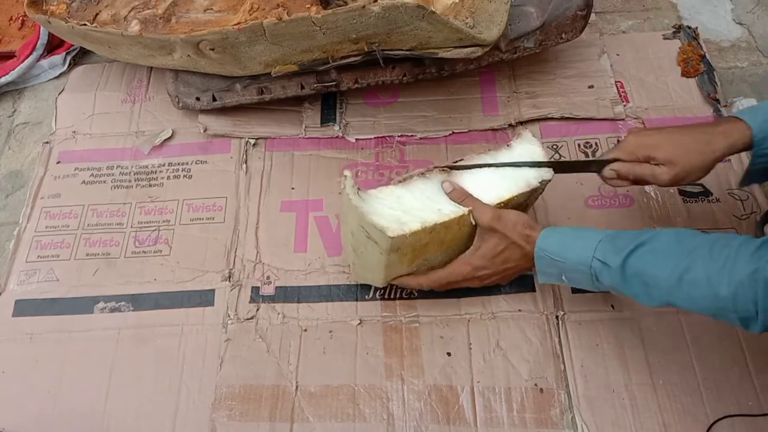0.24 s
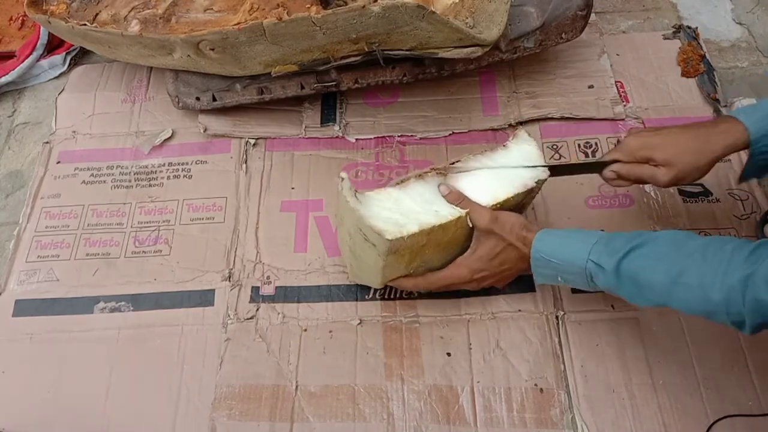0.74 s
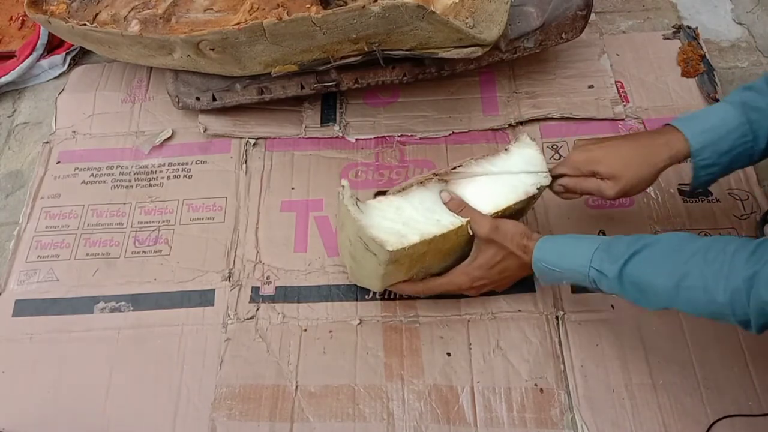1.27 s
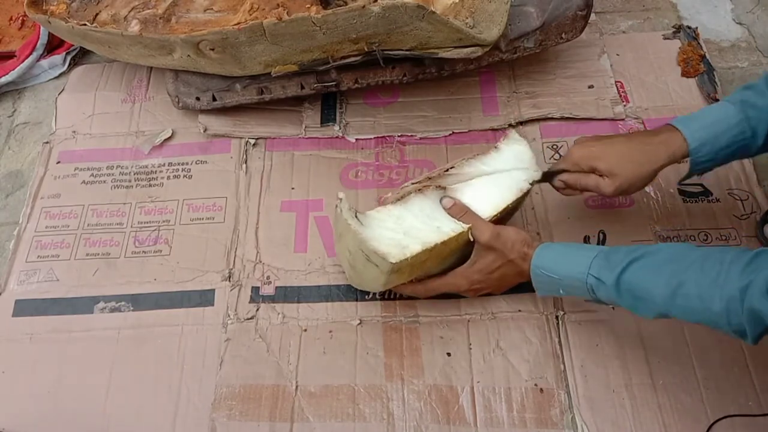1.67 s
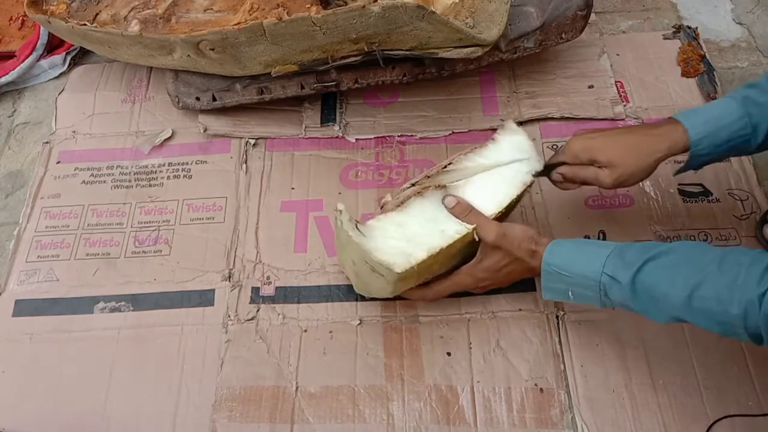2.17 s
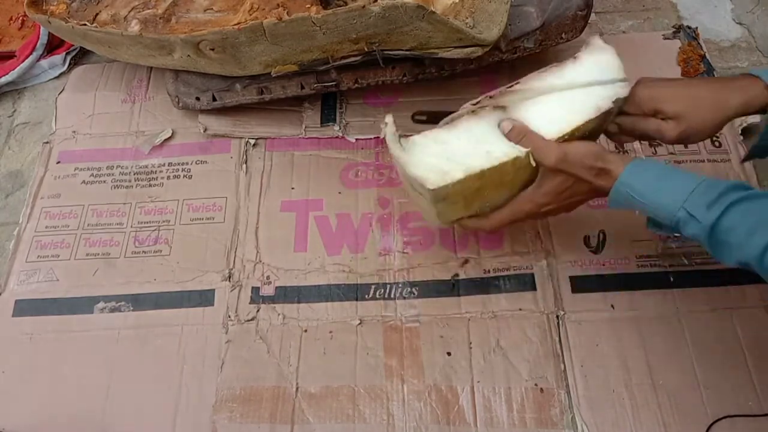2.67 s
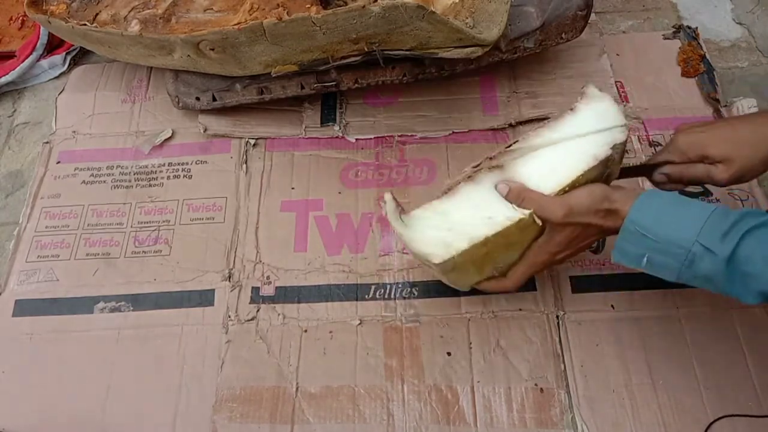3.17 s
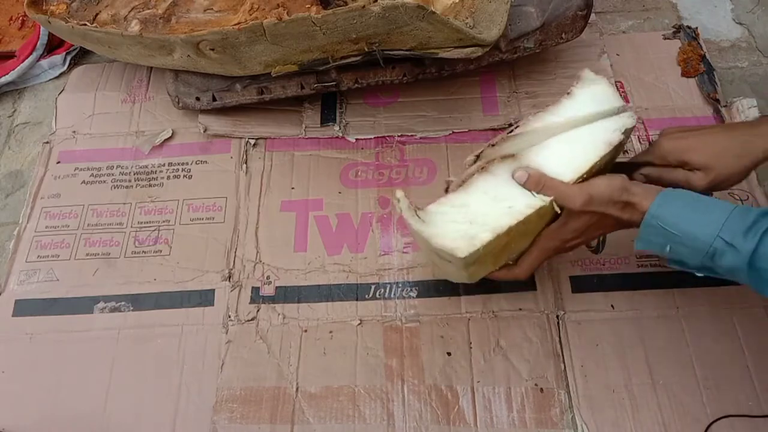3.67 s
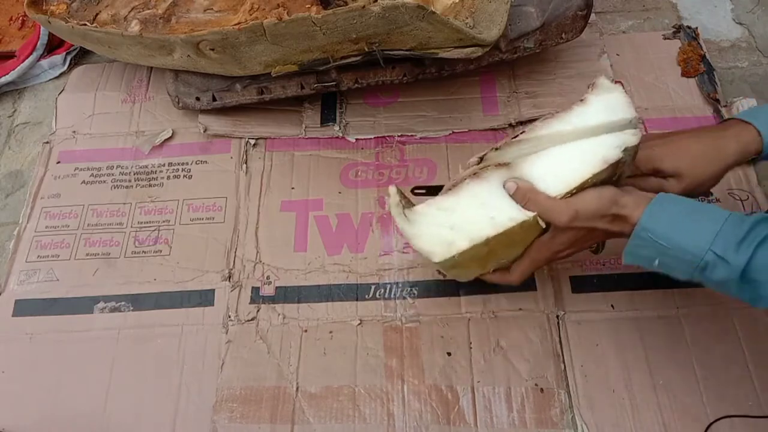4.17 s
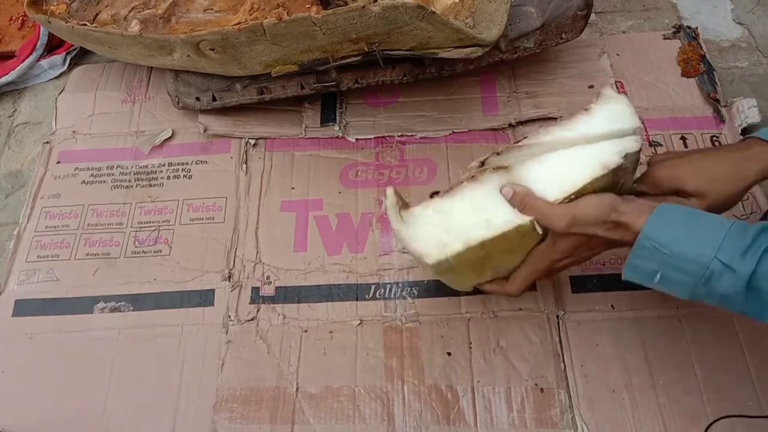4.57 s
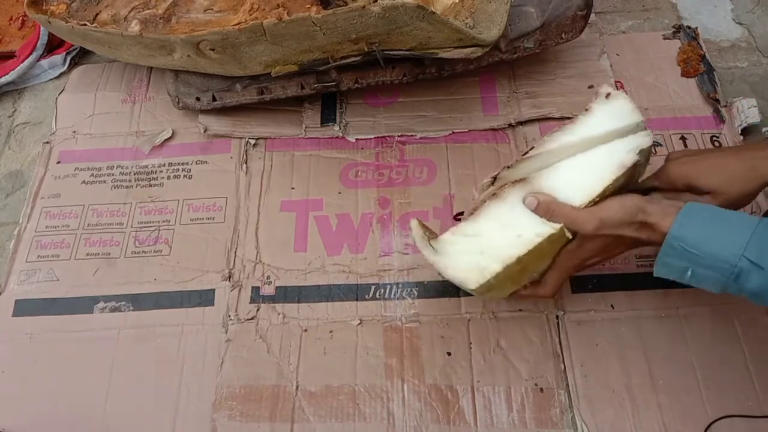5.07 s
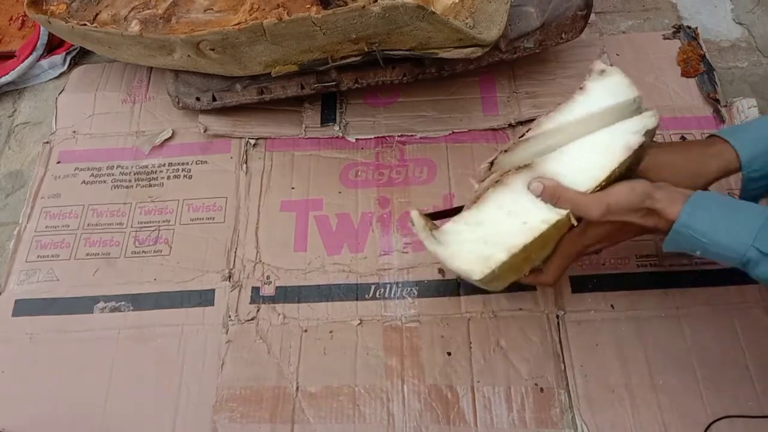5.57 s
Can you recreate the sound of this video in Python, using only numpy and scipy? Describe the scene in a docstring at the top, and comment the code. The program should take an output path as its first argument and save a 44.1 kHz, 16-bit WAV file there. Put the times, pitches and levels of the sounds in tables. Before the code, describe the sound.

From the very start, a knife saws back and forth through a block of stiff foam, close to the microphone. The strokes are short and uneven, about five or six a second, each a low, rasping grunt with crunch and fine hiss on top. Some lock into a brief squeaky groan that bends up and down in pitch. The blade snags with a dry tick at about 0.4 and 3.8 seconds. The strokes turn lighter and patchier between 1.6 and 2.6 seconds, then grow crunchier, alternating strong and weak, with tiny pauses near 3.9 and 4.6 seconds. Further off, a small bird gives high, gliding chirps from 0.6 to 2.7 seconds and again from 3.5 to 3.8, with a slight echo off the workshop walls. The background is otherwise very quiet, and the fairly dry sawing continues until the end at 5.8 seconds.

```python
"""From the start, a knife saws back and forth through a hand-held block of stiff foam, close by.
The blade sticks and slips: each slip knocks the block and tears a few cells, which hiss and crackle.
In some strokes the slips lock into a groan; now and then the edge snags with a dry tick.
From 0.6 to 3.8 s a small bird chirps further off; the workshop walls answer both.
The sawing goes on to the end at 5.8 s."""
import sys
import numpy as np
from scipy import signal
from scipy.fft import rfft, irfft, next_fast_len
from scipy.io import wavfile
from scipy.ndimage import uniform_filter1d, map_coordinates

SR = 44100
rng = np.random.default_rng(int(sys.argv[2]) if len(sys.argv) > 2 else 0)


def dump(signal):
    """Clip the signal to [-1, 1] and save it as 16-bit WAV at the path in sys.argv[1]."""
    limited = np.clip(np.atleast_2d(signal).T, -1, 1)
    pcm = np.round(limited * 32767).astype(np.int16)
    wavfile.write(sys.argv[1], SR, pcm)


N = 257014


def amp(db):
    """Decibels to gain."""
    return 10 ** (np.asarray(db) / 20)


def unit(x):
    """x at rms 1."""
    return x / np.sqrt(np.mean(x ** 2) + 1e-20)


def along(points, hz):
    """(Hz, value) points read on a log axis."""
    point_hz, values = np.transpose(points)
    return np.interp(np.log(hz + 1), np.log(point_hz + 1), values)


def wobble(rate_hz):
    """Smooth random curve, rate_hz knots a second."""
    knots = rng.standard_normal(int(N * rate_hz / SR) + 4)
    return map_coordinates(knots, [np.arange(N) * rate_hz / SR])


def filtered(x, response):
    """Zero-phase filter with gain response(hz)."""
    size = next_fast_len(N + SR // 2)
    return irfft(rfft(x, size) * response(np.fft.rfftfreq(size, 1 / SR)), size)[:N]


def low_band(x, cutoff_hz, slope):
    """Low-pass, falling 6 * slope dB per octave."""
    return filtered(x, lambda hz: 1 / (1 + (hz / cutoff_hz) ** slope))


def ring(x, spectrum, size=4096):
    """x through a minimum-phase body with this (Hz, dB) spectrum."""
    gain = np.maximum(amp(along(spectrum, np.fft.rfftfreq(size, 1 / SR))), 1e-6)
    cepstrum = irfft(np.log(gain))
    cepstrum[1:size // 2] *= 2
    cepstrum[size // 2 + 1:] = 0
    return signal.fftconvolve(x, irfft(np.exp(rfft(cepstrum))))[:N]


def steady(x, span_s):
    """x at rms 1 over every span; faster grain stays."""
    width = int(span_s * SR) + 1
    power = uniform_filter1d(uniform_filter1d(x ** 2, width), width)
    return x / np.sqrt(np.abs(power) + 1e-4 * np.mean(x ** 2))


def still_air():
    """Faint, mostly low noise of the workshop."""
    # Each row: frequency in Hz, relative level in dB.
    spectrum = [(25, -24), (120, 13.5), (600, -7), (2000, -23), (4500, -23.5), (15000, -29)]
    return amp(-66) * unit(ring(rng.standard_normal(N), spectrum))


def room(x, build_s, t60_scale):
    """Diffuse reflections off the walls: they build up, then decay, treble first."""
    # Each row: frequency in Hz, unscaled T60 in seconds.
    wall_decay = [(150, 0.63), (600, 0.36), (1600, 0.51), (4000, 0.31), (12000, 0.12)]
    hz, t, noise = signal.stft(rng.standard_normal(SR), SR, nperseg=256)
    t60_s = t60_scale * along(wall_decay, hz)[:, None]
    envelope = amp(-60 * t / t60_s) * (1 - np.exp(-(t / build_s) ** 2))
    tail = signal.istft(noise * envelope, SR, nperseg=256)[1]
    return signal.fftconvolve(x, tail / np.linalg.norm(tail))[:N]


def bird():
    """Gliding whistles: direct, smeared by near surfaces, off a far wall and through the room."""
    # Each row: start, crest and end in seconds, pitch at each of the three in Hz,
    # relative crest level in dB, swell before the crest in dB, fade after it in dB.
    chirps = [ (.585, .602, .65, 3590, 3500, 2630, -44, 15.5, 8),
              (0.816, .848, 0.9, 3550, 4667, 4190, -29.5, 28, 22),
              (1.06, 1.074, 1.23, 4340, 5286, 4670, -40.5, 5, 13.5),
              (1.136, 1.183, 1.41, 4420, 3684, 2894, -44, 13, 11),
              (1.728, 1.737, 1.775, 3452, 3480, 1840, -56.5, 6, 12),
              (2.02, 2.052, 2.097, 3508, 3612, 2418, -43.5, 15, 5),
              (2.276, 2.34, 2.376, 2876, 4650, 4040, -33, 32, 14),
              (2.45, 2.46, 2.52, 3610, 3800, 3518, -41, 16, 25),
              (2.605, 2.619, 2.658, 4390, 5088, 4550, -46, 8, -5.5),
              (3.511, 3.535, 3.56, 3422, 3782, 3700, -43.5, 19, 16),
              (3.577, 3.622, 3.64, 4110, 4560, 4637, -38.5, 11.5, 8),
              (3.636, 3.682, 3.815, 5400, 4750, 3338, -43.5, 10, 12)]
    rise_bend, fall_bend, fade_bend, ramp_s = 1.3, 1.4, 0.57, 0.003
    song, t = np.zeros(N), np.arange(N) / SR
    waver, flutter = wobble(600), amp(1.3 * wobble(140))
    for start, crest, end, first_hz, crest_hz, last_hz, crest_db, swell_db, fade_db in chirps:
        on = (t > start) & (t < end)
        age_s, rising = t[on] - start, t[on] < crest
        height = np.interp(t[on], [start, crest, end], [0, 1, 0])
        edge_hz = np.where(rising, first_hz, last_hz)
        pitch_hz = edge_hz + (crest_hz - edge_hz) * height ** np.where(rising, rise_bend, fall_bend)
        level_db = crest_db - np.where(rising, swell_db, fade_db) * (1 - height) ** fade_bend
        ramp = np.clip(np.minimum(age_s, end - t[on]) / ramp_s, 0, 1)
        # A long note turns hoarse as it slides down from its top.
        drop = 1 - pitch_hz / np.maximum.accumulate(pitch_hz)
        hoarse = 0.0096 + np.clip(2.2 * drop * age_s, 0, 0.09)
        phase = 2 * np.pi * np.cumsum(pitch_hz * (1 + hoarse * waver[on])) / SR
        song[on] += amp(level_db) * ramp * flutter[on] * np.sin(phase)
    smeared = room(song, build_s=0.0015, t60_scale=0.26)
    echo = np.interp(t - 0.052, t, smeared, left=0)
    reverb = room(song, build_s=0.039, t60_scale=1.0)
    return amp(4.5) * song + amp(0.5) * smeared + amp(-9.5) * echo + amp(-8.5) * reverb


def snags():
    """Dry ticks where the edge catches, then scrapes free."""
    # Each row: start in seconds, relative level in dB.
    catches = [(.145, -52), (.171, -50), (.367, -30), (2.822, -51), (3.763, -31)]
    bursts, t = np.zeros(N), np.arange(SR // 10) / SR
    for start, level_db in catches:
        tick = amp(level_db - 6 - 60 * t / 0.03)
        scrape = amp(level_db - 15 - 60 * t / 0.15)
        bursts[round(start * SR):][:len(t)] += (tick + scrape) * rng.standard_normal(len(t))
    spectrum = [(150, -21), (700, 18.5), (2000, -4.5), (4800, 5.5), (7000, -18.5), (15000, -21)]
    return ring(bursts, spectrum)


def cardboard(x):
    """The deep bass follows how firmly the block rests on cardboard."""
    # Each row: time in seconds, bass gain in dB.
    contact = [(0, 5), (1.9, -1), (2.6, 2), (3.5, -1), (4.4, -4.5), (5.4, -2)]
    bass_db = np.interp(np.arange(N) / SR, *np.transpose(contact))
    return x + (amp(bass_db) - 1) * low_band(x, cutoff_hz=130, slope=4)


def sawing(layer, sag_db, release_s, extra_tail_db, fade_db_per_s, bite_share):
    """Level in dB of one layer: each stroke grips, arches, lets go and leaves a faint ringing tail."""
    # One push or pull per row: start and end in seconds, attack in seconds per 20 dB, levels of
    # grunt, crunch and hiss in dB, pressure growth along the stroke in dB, relative tail level in dB.
    strokes = [(0.003, 0.061, 0.039, -32.5, -39.5, -41.0, -5.0, -15.0),
               (0.225, 0.336, 0.015, -33.0, -44, -51, -0.5, -9.0),
               (0.403, 0.483, 0.016, -36.5, -41.5, -47.5, 2.5, -13.5),
               (0.467, 0.586, 0.019, -29.5, -40.5, -43, 3.5, -15.5),
               (0.747, 0.844, 0.043, -30.0, -38, -46.5, 1.5, -17.0),
               (0.928, 1.021, 0.031, -33.0, -40.0, -47, -1.5, -15.5),
               (1.056, 1.129, 0.047, -28.5, -36, -45.5, 9, -15.5),
               (1.344, 1.45, 0.021, -30.5, -38, -52, 3.0, -14.0),
               (1.53, 1.582, 0.015, -28.5, -36.5, -46.5, 1.5, -16.0),
               (1.591, 1.68, 0.019, -64.5, -56, -56.5, -9, -6.0),
               (1.773, 1.834, 0.021, -61.0, -60, -62.5, 1.0, -10.0),
               (1.891, 1.964, 0.04, -38.0, -44.5, -58, 0.0, -14.5),
               (2.051, 2.097, 0.018, -30.5, -34, -46.5, 7.5, -11.5),
               (2.109, 2.208, 0.016, -48.5, -51.0, -57, 2.5, -16.5),
               (2.303, 2.459, 0.011, -60.0, -58, -65, -5, -15.5),
               (2.473, 2.571, 0.026, -44.5, -45.5, -58.5, 9, -17.0),
               (2.645, 2.721, 0.033, -28.0, -28, -40.5, 6.0, -19.0),
               (2.867, 2.937, 0.039, -38.5, -37.5, -60.5, 4.0, -10.5),
               (3.024, 3.09, 0.024, -30.0, -30.0, -48, 12.5, -16.5),
               (3.206, 3.297, 0.048, -34.5, -34.5, -61, 5.0, -13.0),
               (3.392, 3.455, 0.015, -27.5, -28, -47.5, 8.5, -16.0),
               (3.564, 3.64, 0.044, -35.5, -30.0, -58, 5.5, -14.0),
               (3.696, 3.777, 0.00698, -29.0, -32.5, -50, 1.0, -19.0),
               (3.982, 4.045, 0.044, -40.0, -39, -68.5, 6.0, -14.0),
               (4.102, 4.175, 0.017, -25.0, -26.5, -47, 5.5, -19.5),
               (4.305, 4.369, 0.035, -36.5, -38, -61.5, 3.5, -12.5),
               (4.471, 4.554, 0.033, -32.5, -40, -54, -8, -27.0),
               (4.703, 4.764, 0.033, -40.5, -37.5, -65, 6.5, -15.0),
               (4.824, 4.92, 0.012, -25.5, -30.5, -48, 8.0, -21.5),
               (5.066, 5.121, 0.021, -39.0, -41, -65.5, -3, -12.0),
               (5.204, 5.286, 0.02, -28.0, -35, -51, 8.5, -20.0),
               (5.412, 5.48, 0.031, -39.5, -37, -59.5, 6.5, -14.5),
               (5.569, 5.645, 0.021, -26.5, -31.5, -47.0, 6.0, -19.0),
               (5.776, 5.835, 0.023, -36, -35.0, -56, 4.0, -13)]
    # Brief dips in level between strokes, two almost silent. Each row: time in seconds, depth in dB.
    dips = [(.16, -8), (.68, -5), (1.279, -8), (3.93, -20), (4.635, -20), (5.365, -9)]
    # The edge holds, then bites. Each row: time in seconds, unscaled dip before and jump after in dB.
    bites = [(.221, 8), (0.741, 5), (.932, 5.5), (1.072, 6), (1.123, 8), (1.528, 8), (2.044, 4), (2.078, 7),
             (3.389, 1.5), (3.697, 5), (4.1, 3), (4.132, 4.5), (4.473, 3.5), (4.684, 4), (4.819, 3.5),
             (5.231, 3.5), (5.401, 5), (5.797, 2.5)]
    tail_onset_s, dip_s, bite_s = 0.03, 0.025, 0.01393
    column = ("grunt", "crunch", "hiss").index(layer)
    t = np.arange(0, N, 32) / SR
    power = np.zeros(len(t))
    for start, end, attack_s, *levels_db, growth_db, tail_level_db in strokes:
        travel = 2 * np.clip((t - start) / (end - start), 0, 1) - 1
        before_s, left_s, after_s = np.maximum([start - t, end - t, t - end], 0)
        arch_db = growth_db * travel / 2 - sag_db * travel ** 2
        cut_db = arch_db - 20 * before_s / attack_s - 20 * after_s / release_s
        tail_db = tail_level_db + extra_tail_db - fade_db_per_s * after_s - 20 * left_s / tail_onset_s
        power += amp(levels_db[column] + cut_db) ** 2 + amp(levels_db[column] + tail_db) ** 2
    dip_db = sum(depth_db * np.exp(-((t - at) / dip_s) ** 2) for at, depth_db in dips)
    bite_db = sum(jump_db * np.sign(t - at) * np.exp(-np.abs(t - at) / bite_s) for at, jump_db in bites)
    level_db = 10 * np.log10(power + 1e-20) + dip_db + bite_share * uniform_filter1d(bite_db, size=4)
    return np.interp(np.arange(N) / SR, t, level_db)


def stick_slip(rate_hz, scatter_periods, spread_db):
    """One pulse per slip of the blade, uneven in time and size."""
    at = np.flatnonzero(np.diff(np.floor(np.cumsum(rate_hz) / SR)))
    shift, size = rng.standard_normal((len(at), 2)).T
    at = np.clip(at + scatter_periods * shift * SR / rate_hz[at], 0, N - 1).astype(int)
    return np.bincount(at, amp(spread_db * size), N)


def shifting_peaks(x, depth_db):
    """Narrow random peaks that drift and colour the cutting noise."""
    spectra = signal.stft(x, nperseg=512)[2]
    field = uniform_filter1d(rng.standard_normal(spectra.shape), size=3, axis=0)
    field = uniform_filter1d(field, size=26, axis=1)
    return signal.istft(spectra * unit(amp(depth_db * unit(field))), nperseg=512)[1][:N]


def tearing(slips, spectrum, burst_s, floor, spread_db):
    """Tiny cell ruptures, crowding just after each slip; rms 1."""
    t = np.arange(SR // 20) / SR
    crowding = unit(signal.fftconvolve(slips, np.exp(-t / burst_s))[:N])
    cracks = rng.standard_normal(N) * amp(spread_db * rng.standard_normal(N))
    crackle = ring(cracks * (crowding + floor), spectrum)
    return steady(shifting_peaks(crackle, depth_db=3.5), span_s=0.011)


def groan(jitter, rough_db):
    """Locked stick-slip, highest where the blade is fastest: a tone of rms 1 and its power share."""
    # Each row: start, crest and end in seconds, edge and crest pitch in Hz, share of the block's power.
    groans = [ (0.221, 0.299, 0.32, 270, 567, 0.68), (.735, 0.807, .85, 340.1, 729.2, 0.51),
              (1.114, 1.13, 1.148, 480, 554.2, 0.5), (1.343, 1.396, 1.42, 400.1, 540, 0.72),
              (2.044, 2.092, 2.09, 566.2, 597.5, 0.72), (2.668, 2.706, 2.8, 599, 849, 0.3),
              (3.051, 3.086, 3.08, 563.3, 850, 0.32), (3.558, 3.611, 3.74, 640.4, 892.4, 0.36),
              (4.12, 4.143, 4.19, 395.4, 800.7, 0.18), (4.849, 4.879, 5.01, 431, 561.3, 0.43),
              (5.403, 5.454, 6.25, 399.4, 713.3, 0.42), (5.582, 5.631, 5.67, 398, 703.5, 0.42),
              (5.766, 5.807, 6.34, 349.4, 827, 0.61)]
    t = np.arange(N) / SR
    pitch_hz, share = np.full(N, 500.), np.zeros(N)
    for start, crest, end, edge_hz, crest_hz, locked in groans:
        on = (t > start) & (t < end)
        arc = np.interp(t[on], [start, crest, end], [-1, 0, 1])
        pitch_hz[on] = crest_hz + (edge_hz - crest_hz) * np.abs(arc) ** 1.3
        share[on] = locked * (1 - arc ** 8)
    phase = 2 * np.pi * np.cumsum(pitch_hz * (1 + jitter * wobble(450))) / SR
    return unit(np.sin(phase) * amp(rough_db * wobble(220))), share


def foam_block(slips, grunt_db, crunch_db):
    """Knocked by the slips, the whole block grunts and the foam at the edge crunches above it."""
    # Response to a slip. Each row: frequency in Hz, relative level in dB.
    spectrum = [(21, -85), (35, -21.5), (92, -4), (172, -5), (212, 1), (305, 0), (389, 1.5), (463, -2),
                (522, 2.5), (726, -4.5), (1030, -3.5), (1180, -12), (1400, -12.5), (1670, -31), (2200, -36),
                (2860, -75), (4840, -120)]
    knocks = slips - uniform_filter1d(slips, SR // 50)
    block = shifting_peaks(ring(knocks, spectrum), depth_db=2.5)
    low = low_band(block, cutoff_hz=650, slope=8)
    high = low_band(block - low, cutoff_hz=1380, slope=10)
    grunt = amp(grunt_db - 0.08) * steady(low, span_s=0.019)
    crunch = amp(crunch_db - 1.0) * steady(high, span_s=0.023)
    # Slips that fall into step gather their power in one tone.
    tone, share = groan(jitter=0.08704, rough_db=3.0)
    tone *= np.hypot(amp(grunt_db), amp(crunch_db))
    return np.sqrt(1 - share) * (grunt + crunch) + np.sqrt(share) * tone


def knife():
    """The blade sticks and slips: it knocks the block, rubs its flanks and tears cells."""
    # Rubbing flanks and tearing cells. Each row: frequency in Hz, relative level in dB.
    rub_spectrum = [(800, -22.5), (1250, 8), (1500, 6.5), (1850, -2.5), (2200, 2), (2750, -2), (3400, 2),
                    (4500, 2.5), (5200, -8.5), (5700, -2.5), (6500, -41), (12000, -36)]
    cell_spectrum = [(1200, -25), (2200, -1.5), (3000, -27), (4500, 4), (5600, 0.5), (6600, 5),
                     (7600, -6.5), (9500, -2), (11500, -12.5), (13800, -17.5), (15200, -8)]
    grunt_db = sawing("grunt", sag_db=1.5, release_s=0.028, extra_tail_db=4.2,
                      fade_db_per_s=130, bite_share=1.05)
    crunch_db = sawing("crunch", sag_db=2.2, release_s=0.019, extra_tail_db=2.4,
                       fade_db_per_s=152, bite_share=0.51)
    hiss_db = sawing("hiss", sag_db=3, release_s=0.0377, extra_tail_db=-6,
                     fade_db_per_s=83, bite_share=0.13)
    # A light stroke skates in many fine slips; a hard one sticks longer.
    slip_hz = np.clip(800 * amp(-0.2 * (grunt_db + 30)), 300, 2000)
    slips = stick_slip(slip_hz, scatter_periods=1.078, spread_db=3.5)
    body = foam_block(slips, grunt_db, crunch_db)
    rub_db = 0.44 * crunch_db + 0.6 * hiss_db + 3.0  # grows with pressure and speed
    rub = amp(rub_db) * tearing(slips, rub_spectrum, burst_s=0.0025, floor=0.96, spread_db=2.5)
    hiss = amp(hiss_db + 3.0) * tearing(slips, cell_spectrum, burst_s=0.0016, floor=0.97, spread_db=1.0)
    return body + rub + hiss


def scene():
    """Near knife, far bird and workshop air, in mono."""
    cutting = cardboard(knife()) * amp(wobble(30))  # uneven foam: about 1 dB of waver
    cutting += snags()
    air = still_air()
    reverb = amp(-27) * room(cutting, build_s=0.0014, t60_scale=0.35)
    return (cutting + reverb + bird() + air)[None]


def record(dry):
    """A noise suppressor lowers the quietest moments; the microphone sheds deep bass and top treble."""
    threshold_db, low_cut_hz, top_hz = -62, 38, 15750
    rms = np.sqrt(np.abs(uniform_filter1d(dry[0] ** 2, SR // 50)))
    gain = rms / np.hypot(rms, amp(threshold_db))
    return filtered(dry[0] * gain, lambda hz: (hz < top_hz) * hz / np.hypot(hz, low_cut_hz))[None]


dry = scene()
out = record(dry)
dump(out)
```